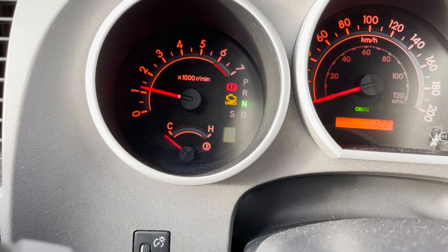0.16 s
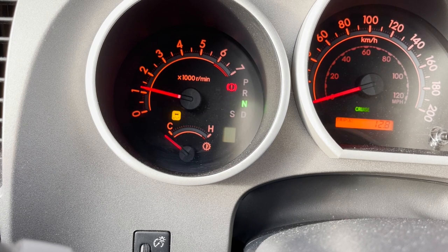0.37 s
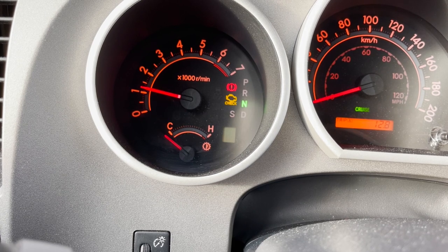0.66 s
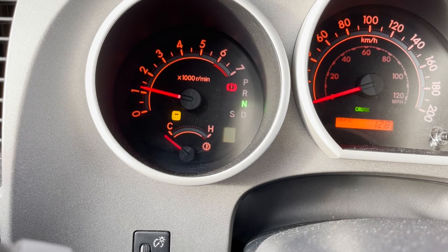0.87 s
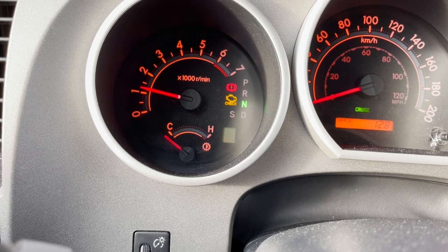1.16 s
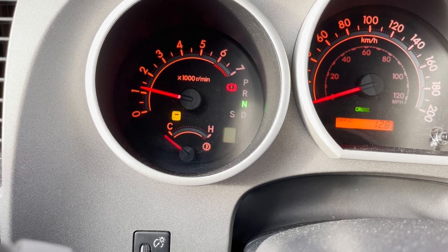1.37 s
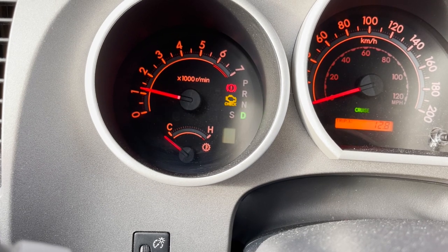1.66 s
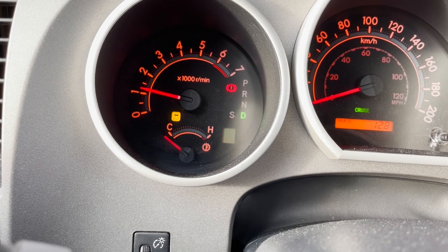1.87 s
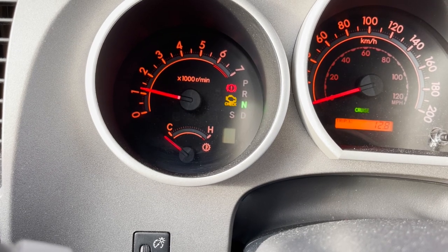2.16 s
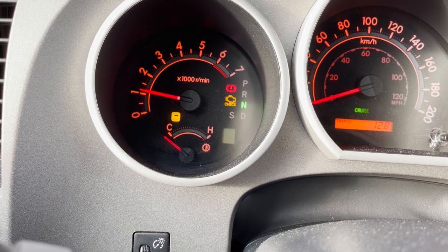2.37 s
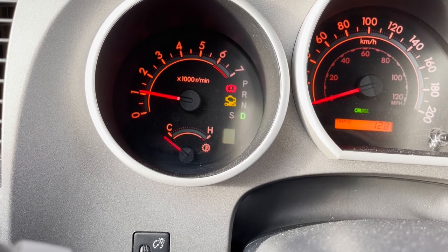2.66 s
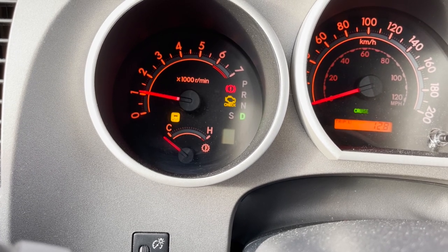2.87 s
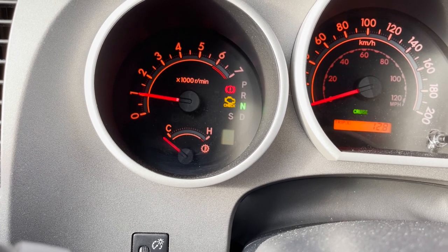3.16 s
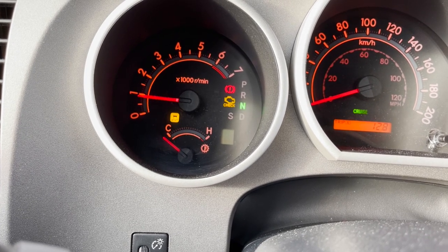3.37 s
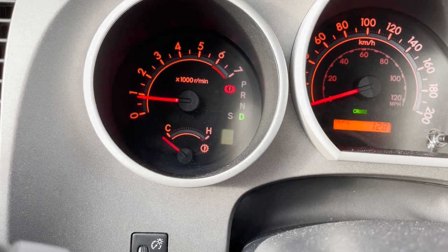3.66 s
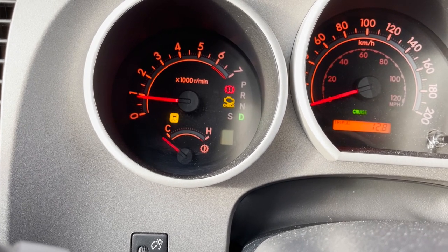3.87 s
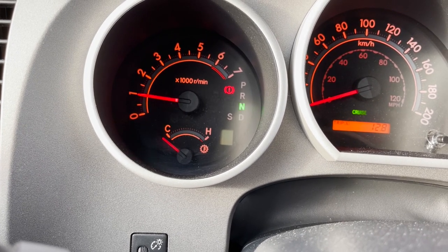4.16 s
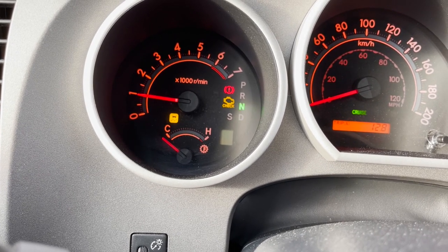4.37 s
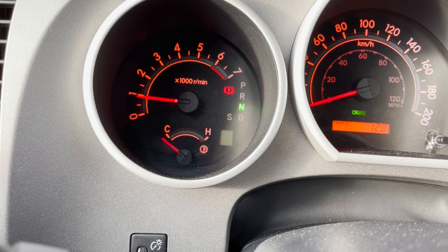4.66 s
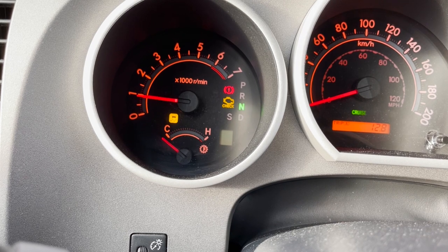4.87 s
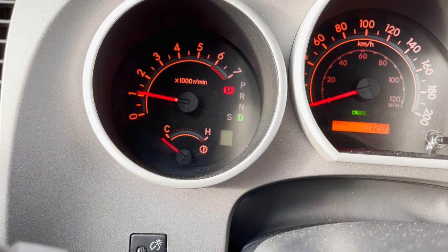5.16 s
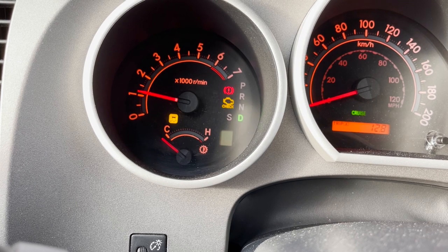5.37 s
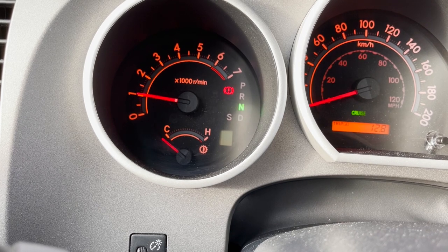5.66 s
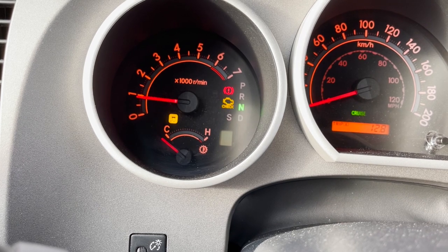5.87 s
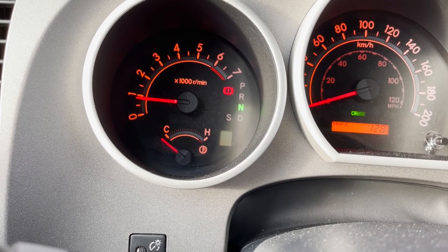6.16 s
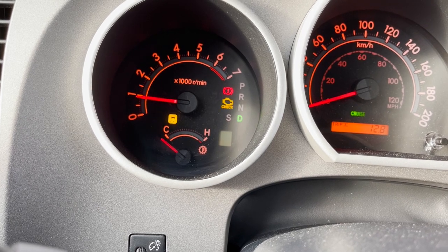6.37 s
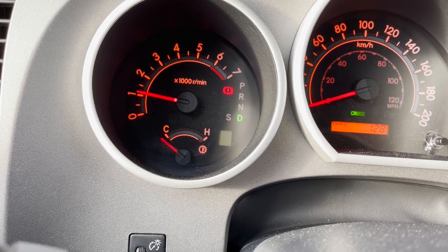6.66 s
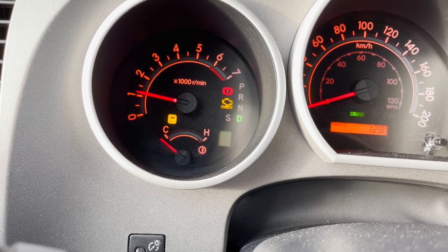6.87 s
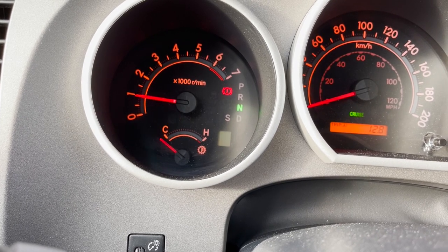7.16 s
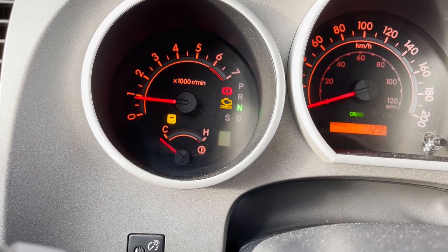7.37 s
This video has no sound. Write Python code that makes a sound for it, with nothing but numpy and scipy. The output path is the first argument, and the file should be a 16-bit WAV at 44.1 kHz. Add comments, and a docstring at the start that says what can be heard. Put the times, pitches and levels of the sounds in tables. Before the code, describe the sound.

Stereo interior perspective of an idling vehicle. Low engine drone starts fairly steady, then dips and rises unevenly, booming in the small cab. From just after one second, a loose lever is worked back and forth, ten shifts in all, each a brief gritty scrape, snap and hollow thud. Alternate strokes are strong and bright, then quieter and muffled, with tiny ticks and a light hand rustle.

```python
"""A truck idles, heard from inside its cab, while a gear lever clacks between neutral and drive.
Each shift is a scrape, a snap and a thud: ringing tones over a grainy rattle of shaped noise.
The lever also ticks as it takes up its play, and slides and rustles as soft bands of noise.
The engine is a set of sine tones over filtered noise. It sags under load and recovers, and
the cab booms whenever the firing rate passes through its air resonance."""
import sys
import numpy as np
from scipy import signal
from scipy.fft import rfft, irfft
from scipy.io import wavfile
from scipy.ndimage import uniform_filter1d

SR = 44100
rng = np.random.default_rng(int(sys.argv[2]) if len(sys.argv) > 2 else 0)


def generate_wav(sig):
    """Save sig (samples, or channels by samples) to the path in sys.argv[1] as 16-bit PCM at SR."""
    pcm = np.round(np.clip(np.atleast_2d(sig).T, -1, 1) * 32767).astype(np.int16)
    wavfile.write(sys.argv[1], SR, pcm)


N = 332073
T = np.arange(N) / SR  # time in seconds
RING = T[:SR // 3]  # time within one blow, a third of a second

# How the engine sags and recovers. Each row: time in seconds, firing rate in Hz.
FIRING_RATE = [(0.0, 83.86), (0.25, 81.27), (1.89, 81.5), (2.2, 74.8), (2.73, 76.8), (2.87, 70.93),
               (3.21, 52.37), (3.54, 57.2), (3.82, 67.64), (3.9, 69.4), (4.36, 57.63), (4.49, 60.36),
               (5.1, 84.1), (5.26, 77.4), (5.47, 58.08), (5.73, 52.66), (5.98, 56.87), (6.29, 79.1),
               (6.5, 84), (6.67, 79.75), (6.9, 62.7), (7.11, 53.4), (7.32, 55.34), (7.53, 66.99)]
# Air resonance of the cab. Each row: firing rate in Hz, level of its tone in dB before effort.
CAB_BOOM = [(52, -35.5), (57, -27.5), (61, -23.5), (65.5, -20.5), (70, -23), (76, -26.5), (81, -39),
            (85, -34)]
# Strength of the firings as the load changes. Each row: time in seconds, change in dB.
EFFORT = [(0, -1), (2.3, .5), (3.1, -4.5), (3.8, 2), (4.2, 0.5), (5.4, 0), (6.1, 0.5), (6.8, 2.5),
          (7.4, -2)]
BOOM_LAG_S = 0.027  # the air of the cab takes this long to follow
BOOM_WAVER_DB, BOOM_WAVER_RATE = 2, 9  # uneven combustion: spread, changes per second
# Weaker engine tones. Each row: multiple of the firing rate, peak level in dB before it wavers.
ENGINE_ORDERS = [(.75, -45.5), (1.25, -43.5), (1.5, -53), (2, -41), (2.5, -57.5), (3, -61)]
# Tone colour of the low engine rumble. Each row: frequency in Hz, relative level in dB.
RUMBLE = [(15, -19), (28, -13), (42, -8), (56, 14), (85, 8), (115, 9.5), (140, -3),
          (170, -1), (215, -9.5), (270, -22), (360, -63.5)]
# Engine bay and fan through the bulkhead. Each row: frequency in Hz, relative level in dB.
ENGINE_BAY = [(150, -29), (250, 1), (375, -9), (406, -1), (434, -6), (694, -19), (1160, -19), (1410, -23),
              (2160, -26), (5250, -50), (12000, -54), (15600, -84), (22000, -120)]
# Cab and bulkhead resonances. Each row: frequency in Hz, width setting in Hz, dB before it throbs.
PANELS = [(159.9, 40, -44.5), (206.4, 35, -52), (433, 160, -71.5), (1165, 28, -66.5), (1319, 24, -71),
          (2149, 70, -74.5)]
# Thin whines of the accessories: frequency in Hz, level in dB before the change.
HIGH_WHINE_HZ, HIGH_WHINE_DB, LOW_WHINE_HZ, LOW_WHINE_DB = 6180, -88, 4820, -87.5
WHINE_WIDTH_HZ = 110  # width setting of each whine's filter
# The upper whine weakens as the lower one comes in. The values: start and end in seconds.
WHINE_CHANGE_S = [3, 4]

# Soft rustles of the hand. Each row: middle in seconds, length in seconds, frequency in Hz,
# width setting in Hz, level in dB.
HAND_RUSTLES = [(0.474, .2, 8300, 1500, -77.5), (5.753, 0.42, 4370, 1640, -74.5)]
# The lever slides out of drive, starting this long before each landing in neutral.
SLIDE_LEAD_S, SLIDE_S, SLIDE_HZ, SLIDE_WIDTH_HZ, SLIDE_DB = 0.2, 0.16, 7700, 3800, -78

# Lever lands in drive. Each row: time in seconds, then thud, knock, crack and snap levels in dB
# before the shared offsets, then the most favoured frequency in Hz.
INTO_DRIVE = [(1.374, -20.5, -25.5, -26, -27.5, 781), (2.448, -21, -27.5, -25, -27, 457.3),
              (3.498, -21, -23.5, -26.5, -29.5, 785.5), (4.867, -16.5, -25, -26.5, -26.5, 289),
              (6.256, -17, -24, -26.5, -27, 350)]
# Lever lands in neutral. Each row: time in seconds, then thud, knock, crack and snap levels in dB
# before the shared offsets, then the most favoured frequency in Hz.
INTO_NEUTRAL = [(1.931, -26.5, -28.5, -39.5, -36.5, 454), (3.005, -28.5, -31, -35.5, -37, 478),
                (4.042, -24, -24.5, -34, -32.5, 700), (5.441, -22.5, -27, -37, -37, 298.6),
                (6.83, -25, -23.5, -34.5, -32.5, 690)]
# Lever and console struck on the drive side of the detent. Each row: frequency in Hz,
# relative level in dB, time to fall 60 dB in seconds; later steps scale the time and vary the rest.
DRIVE_MODES = [(237.0, 0.0, 0.123), (275, -4.5, 0.12), (361.0, -5.3, 0.116), (458, -9.1, 0.111),
               (528.0, -8.1, 0.109), (668.0, -10.0, 0.105), (781.0, -9.9, 0.103), (910.0, -19.9, 0.101),
               (1055.0, -16.8, 0.098), (1130.0, -13.6, 0.097), (1330.0, -21.5, 0.095), (1760, -18.6, 0.091),
               (1868.0, -18.4, 0.09), (2105, -16.6, 0.089), (2169.0, -15.7, 0.088), (2315.0, -26.1, 0.087),
               (2622.0, -25.1, 0.086), (2880.0, -27.8, 0.085), (3133.0, -30.9, 0.084),
               (4247.0, -33.7, 0.08), (4996.0, -27.5, 0.078), (5308.0, -27.8, 0.077),
               (5593.0, -23.6, 0.077), (6659.0, -27.9, 0.075), (8113.0, -25.4, 0.072),
               (8457.0, -28.9, 0.072), (9485.0, -32.9, 0.071), (9997.0, -29.5, 0.07),
               (10632.0, -30.2, 0.07)]
# The same parts struck on the neutral side. Each row: frequency in Hz, relative level in dB,
# time to fall 60 dB in seconds; later steps scale the time and vary the rest.
NEUTRAL_MODES = [(237.0, 0.0, 0.123), (301, -4.8, 0.119), (447, -6.6, 0.112), (484.0, -4.9, 0.111),
                 (684.0, -4.7, 0.105), (807, -13.0, 0.102), (872.0, -15.0, 0.101), (937.0, -16.4, 0.1),
                 (1055.0, -12.1, 0.098), (1120.0, -15.3, 0.097), (1324.0, -17.4, 0.095),
                 (1529.0, -19.0, 0.093), (1873, -22.0, 0.09), (2169, -25.3, 0.088), (2611.0, -22.8, 0.086),
                 (2729.0, -23.8, 0.085), (3122.0, -27.2, 0.084), (3370.0, -29.4, 0.083),
                 (6072.0, -30.6, 0.076), (6627.0, -28.2, 0.075), (7682.0, -27.3, 0.073),
                 (8737.0, -25.6, 0.072), (9254.0, -26.5, 0.071), (9938.0, -26.1, 0.07),
                 (10557.0, -26.4, 0.07)]
# Dense ring of the trim around them, into drive. Each row: frequency in Hz, relative level in dB.
DRIVE_TRIM = [(65, -17), (110, 8.5), (286, -3), (910, -16.5), (1130, -14), (1380, -22.5), (2100, -21),
              (3970, -40), (8310, -35), (12900, -46.5), (16700, -83), (22000, -120)]
# Dense ring of the trim, into neutral. Each row: frequency in Hz, relative level in dB.
NEUTRAL_TRIM = [(65, -42), (110, -7.5), (386, -21), (716, -10), (1110, -31.5), (1410, -33.5), (1590, -18),
                (3970, -39), (8820, -35), (12900, -43), (16700, -88), (22000, -120)]
# Tone colour of the detent scrape. Each row: frequency in Hz, relative level in dB.
SCRAPE = [(200, 1.5), (600, 20.5), (2200, 6.5), (3800, -2.5), (8800, -7), (11000, -12)]
FOCUS_WIDTH_HZ = 75  # how far from the favoured frequency the boost reaches

# Lever takes up its play. Each row: time in seconds, hollow level in dB, body level in dB,
# treble level in dB, most favoured frequency in Hz.
TICKS = [(1.304, -55.5, -49.5, -53.5, 1870), (1.8114, -61, -55.5, -72, 2950), (2.0475, -64, -60, -71, 1870),
         (2.3564, -63, -64, -76, 2230), (2.8679, -48, -53.5, -69, 2230), (3.3226, -64, -61, -75.5, 1870),
         (3.4028, -56.5, -59.5, -92, 2230), (6.116, -65, -61, -75, 1870), (6.1843, -62, -58, -84, 2230)]
# Loose parts of the lever. Each row: frequency in Hz, relative level in dB,
# time to fall 60 dB in seconds; later steps vary the frequency and level.
PLAY_MODES = [(720, -7, .08), (1060, -9, .07), (1300, 0, .1), (1870, -3, .09), (2230, -3, .08),
              (2950, -7, .08), (5010, -20, .04), (5870, -21, .04), (8600, -19, .04)]
# Tone colour of the rattle in a tick. Each row: frequency in Hz, relative level in dB.
TICK_TRIM = [(600, 21), (2300, -10), (4000, -14), (8500, -11.5), (12000, -16)]

TOP_HZ = 13100  # everything above is cut


def undb(db):
    """Turn decibels into a plain multiplier."""
    return 10 ** (np.asarray(db) / 20)


def level(x, db):
    """Set the average (rms) strength of a sound."""
    return x * undb(db) / np.sqrt(np.mean(x ** 2))


def shaped(x, gain):
    """Filter a sound by a gain that depends on frequency."""
    size = x.shape[-1]
    # doubling the length with silence keeps the end from wrapping onto the start
    spectrum = rfft(x, 2 * size)
    hz = np.fft.rfftfreq(2 * size, 1 / SR) + 1e-3
    return irfft(spectrum * gain(hz))[..., :size]


def colour(points):
    """Make a gain curve through (Hz, dB) points."""
    hz, db = np.transpose(points)
    return lambda f: undb(np.interp(np.log(f), np.log(hz), db))


def resonance(hz, width):
    """Make the gain curve of one damped resonance."""
    return lambda f: 1 / (1 + 1j * (f / hz - hz / f) * hz / width)


def register(lo_hz, hi_hz):
    """Make the gain curve of a band with steep edges."""
    return lambda f: 1 / np.sqrt((1 + (lo_hz / f) ** 12) * (1 + (f / hi_hz) ** 12))


def noise(size, spread):
    """Two channels of noise with a share that differs left and right."""
    mid, side = rng.standard_normal((2, size))
    return np.array([mid + spread * side, mid - spread * side])


def walk(rate):
    """A smooth random drift with spread 1: levels held 1 / rate seconds, then smoothed twice."""
    hold = int(SR / rate)
    steps = np.repeat(rng.standard_normal(N // hold + 1), hold)
    drift = uniform_filter1d(uniform_filter1d(steps, hold), hold)[:N]
    return drift / drift.std()


def pan(db):
    """Channel gains that make the left louder than the right by this many dB."""
    return undb(np.array([[db], [-db]]) / 2)


def add(out, s, x):
    """Mix a sound in at a time in seconds."""
    i = int(s * SR)
    out[:, i:i + x.shape[-1]] += x[..., :N - i]


def boom(hz):
    """Strength of the firing tone: the cab resonance, a little late, driven by engine effort."""
    heard_hz = np.interp(T - BOOM_LAG_S, T, hz)
    effort_db = np.interp(T, *np.transpose(EFFORT))
    waver_db = BOOM_WAVER_DB * walk(BOOM_WAVER_RATE)
    return colour(CAB_BOOM)(heard_hz) * undb(effort_db + waver_db)


def whine(hz, db):
    """A thin, unsteady tone: noise through a narrow resonance, twice."""
    return level(shaped(noise(N, 0.62), lambda f: resonance(hz, WHINE_WIDTH_HZ)(f) ** 2), db)


def engine():
    """Firings boom in the cab over weaker tones, low rumble, the rush of the bay and whines."""
    hz = np.interp(T, *np.transpose(FIRING_RATE))
    phase = 2 * np.pi * np.cumsum(hz) / SR
    speed = np.log2(hz / hz.mean())  # octaves above the mean idle

    hum = np.sqrt(2) * boom(hz) * np.sin(phase)
    for order, db in ENGINE_ORDERS:
        strength = undb(db + 2 * walk(10) + 2 * speed)
        hum = hum + strength * np.sin(order * phase + rng.uniform(0, 2 * np.pi))

    # long waves reach both microphones nearly alike, so the spread is small
    rumble = level(shaped(noise(N, 0.09), colour(RUMBLE)), -36)

    bay_gain = lambda f: colour(ENGINE_BAY)(f) * register(260, 12000)(f)
    bay = level(shaped(noise(N, 0.87), bay_gain), -49.5)
    for centre, width, db in PANELS:
        air = noise(N, min(centre / 900, 0.8))
        bay = bay + level(shaped(air, lambda f: resonance(centre, width)(f) ** 2), db)
    # the rush follows engine speed and throbs with the firings
    throb = 1 + 0.079 * np.sin(phase)
    bay = bay * undb(2.5 * speed + 0.41 * walk(22)) * throb

    change = np.interp(T, WHINE_CHANGE_S, [0, 1])
    high_whine = (1 - 0.58 * change) * whine(HIGH_WHINE_HZ, HIGH_WHINE_DB)
    low_whine = change * whine(LOW_WHINE_HZ, LOW_WHINE_DB)
    return hum + rumble * pan(-1.5) + bay + high_whine + low_whine


def swish(length, hz, width, db):
    """Uneven friction: a band of noise that swells and fades."""
    size = int(length * SR)
    grit = noise(size, 0.89) * undb(2.5 * walk(120)[:size])
    band = shaped(grit, lambda f: resonance(hz, width)(f) ** 2)
    return level(band * np.hanning(size), db)


def rubs():
    """The hand rustles faintly; the lever slides towards neutral."""
    out = np.zeros((2, N))
    for s, length, hz, width, db in HAND_RUSTLES:
        add(out, s - length / 2, swish(length, hz, width, db))
    for s, *_ in INTO_NEUTRAL:
        add(out, s - SLIDE_LEAD_S, swish(SLIDE_S, SLIDE_HZ, SLIDE_WIDTH_HZ, SLIDE_DB))
    return out


def scrape(db):
    """The detent roller rides up its flank, louder as the spring loads."""
    size = int(0.1 * SR)
    grit_db = np.linspace(-16, 0, size) + 1.8 * walk(250)[:size]
    return level(shaped(noise(size, 0.6) * undb(grit_db), colour(SCRAPE)), db)


def favour(modes, focus_hz, boost_db):
    """The way a part is struck favours the modes near one frequency."""
    struck = []
    for hz, db, decay in modes:
        nearness = np.exp(-((hz - focus_hz) / FOCUS_WIDTH_HZ) ** 2)
        struck.append((hz, db + boost_db * nearness, decay))
    return struck


def swell(rise, t60):
    """Loudness that builds up while the parts collide, then falls 60 dB in about t60 seconds."""
    return (1 - np.exp(-(RING / rise) ** 2)) * np.exp(-np.log(1000) * RING / t60)


def burst(x, db):
    """Set the average strength of the first 40 ms of a hit."""
    return x * undb(db) / np.sqrt(np.mean(x[:, :SR // 25] ** 2))


def clack(modes, trim, band, rise, t60, ring, trim_db, spread, tail_db):
    """One register of a blow: modes over a grainy rattle, with a faint tail from the cab."""
    tones = 0
    for hz, db, decay in modes:
        detune, size, apart = rng.standard_normal(3)
        # each mode reaches the two microphones with its own phase
        offset = spread * np.sign(apart) * np.array([[1], [-1]])
        phase = rng.uniform(0, 2 * np.pi) + offset
        wave = np.sin(2 * np.pi * hz * (1 + 0.002 * detune) * RING + phase)
        tones = tones + undb(db + size) * band(hz) * wave * swell(rise, decay * ring)

    # the rattle jumps to a new random level every 32 samples
    grains = rng.standard_normal(len(RING) // 32 + 1)
    chatter = undb(2.5 * np.repeat(grains, 32)[:len(RING)])
    fade = swell(rise, t60) + undb(tail_db) * swell(0.015, 0.36)
    rattle = shaped(noise(len(RING), spread) * chatter * fade, lambda f: colour(trim)(f) * band(f))
    return burst(tones, 0) + burst(rattle, trim_db)


def shifts(table, modes, trim, thud_db, knock_db, crack_db, snap_db,
           metal_db, metal_ring, scrape_db, shake_db):
    """The detent scrapes and snaps first; the housing and then the heavy console follow."""
    out = np.zeros((2, N))
    for s, thud, knock, crack, snap, focus_hz in table:
        struck = favour(modes, focus_hz, boost_db=4.5)
        low = clack(struck, trim, register(120, 388), rise=0.011, t60=0.16, ring=0.71,
                    trim_db=0, spread=0.36, tail_db=-25.5)
        middle = clack(struck, trim, register(450, 1400), rise=0.009, t60=0.1, ring=0.9,
                       trim_db=-6, spread=0.65, tail_db=-30)
        upper = clack(struck, trim, register(1400, 3500), rise=0.005, t60=0.075, ring=1,
                      trim_db=-4, spread=0.45, tail_db=-38)
        high = clack(struck, trim, register(3500, 20000), rise=0.0041, t60=0.086, ring=metal_ring,
                     trim_db=metal_db, spread=0.78, tail_db=-36)

        slide = scrape(snap + scrape_db)
        add(out, s + 0.003 - slide.shape[-1] / SR, slide)  # ends 3 ms after the landing time
        add(out, s - 0.001, burst(upper, crack + crack_db) * pan(1.9))
        add(out, s - 0.001, burst(high, snap + snap_db) * pan(0.3))
        add(out, s + 0.00049, burst(middle, knock + knock_db) * pan(4.3))
        add(out, s + 0.00415, burst(low, thud + thud_db) * pan(-0.49))
        # the stop of the lever shakes the cab at 33 Hz
        shake = np.sin(2 * np.pi * 33 * RING) * swell(0.031, 0.75)
        add(out, s, undb(thud + shake_db) * shake)
    return out


def ticks():
    """Small plastic contacts just before or after a shift, each built from three registers."""
    out = np.zeros((2, N))
    for s, hollow_db, body_db, treble_db, focus_hz in TICKS:
        struck = favour(PLAY_MODES, focus_hz, boost_db=8)
        hollow = clack(struck, TICK_TRIM, register(550, 1500), rise=0.004, t60=0.06, ring=1,
                       trim_db=-6, spread=0.6, tail_db=-30)
        body = clack(struck, TICK_TRIM, register(1500, 3500), rise=0.003, t60=0.07, ring=1,
                     trim_db=-3, spread=0.6, tail_db=-30)
        treble = clack(struck, TICK_TRIM, register(3700, 11700), rise=0.0017, t60=0.085, ring=1,
                       trim_db=11.5, spread=1, tail_db=-31)
        add(out, s, burst(hollow, hollow_db) + burst(body, body_db) + burst(treble, treble_db))
    return out


def scene():
    """Mix the engine, the small handling sounds and the shifts."""
    drive = shifts(INTO_DRIVE, DRIVE_MODES, DRIVE_TRIM, thud_db=-4, knock_db=-4, crack_db=-8.5,
                   snap_db=-8.5, metal_db=4.5, metal_ring=1.05, scrape_db=-24.5, shake_db=-7.5)
    neutral = shifts(INTO_NEUTRAL, NEUTRAL_MODES, NEUTRAL_TRIM, thud_db=-2.5, knock_db=-3.5, crack_db=-5,
                     snap_db=-5, metal_db=10, metal_ring=1, scrape_db=-20, shake_db=-9.5)
    return engine() + rubs() + drive + neutral + ticks()


def record(dry):
    """Soften the treble around 12 kHz, cut what lies above TOP_HZ, and end without a click."""
    faded = dry * np.minimum((T[-1] - T) / 0.01, 1)  # 10 ms fade-out
    soft = signal.sosfilt(signal.butter(5, 12000, fs=SR, output="sos"), faded)
    return signal.sosfilt(signal.ellip(8, 0.2, 70, TOP_HZ, fs=SR, output="sos"), soft)


dry = scene()
out = record(dry)
generate_wav(out)
```